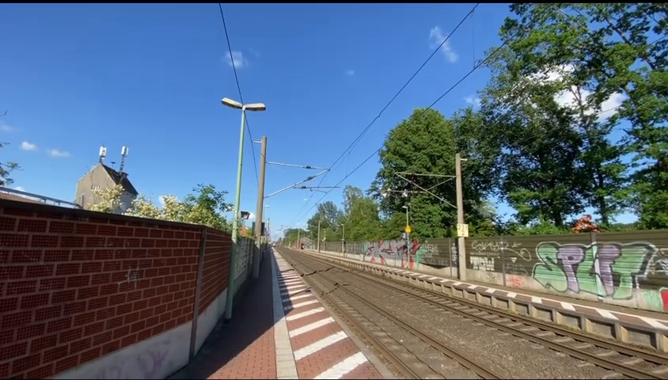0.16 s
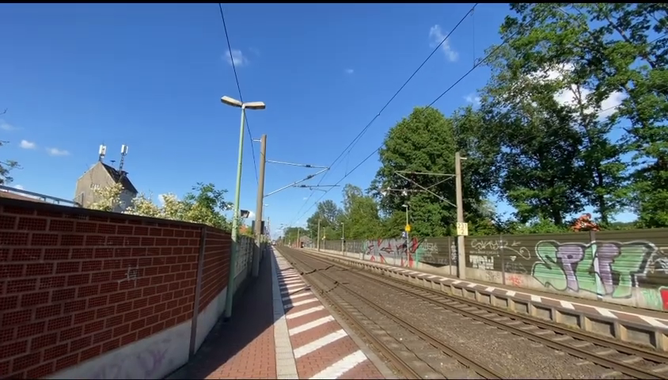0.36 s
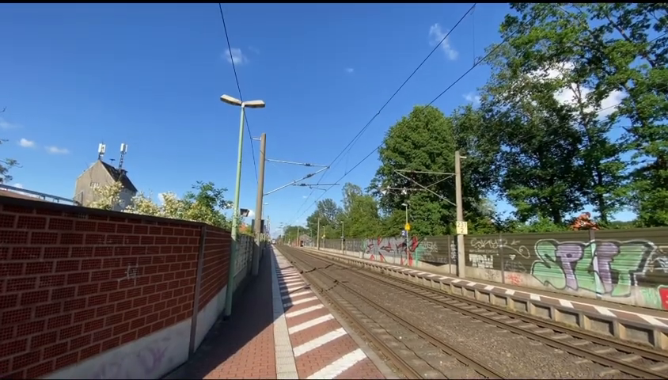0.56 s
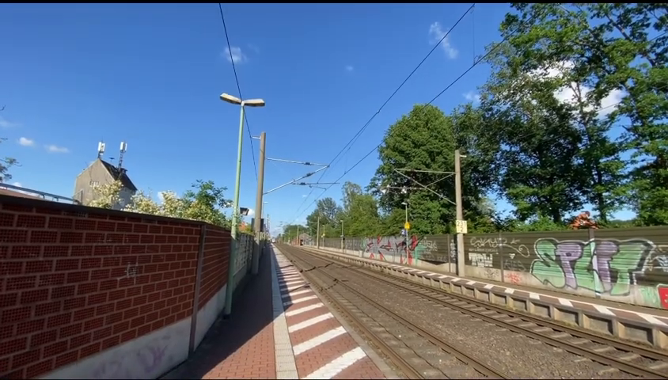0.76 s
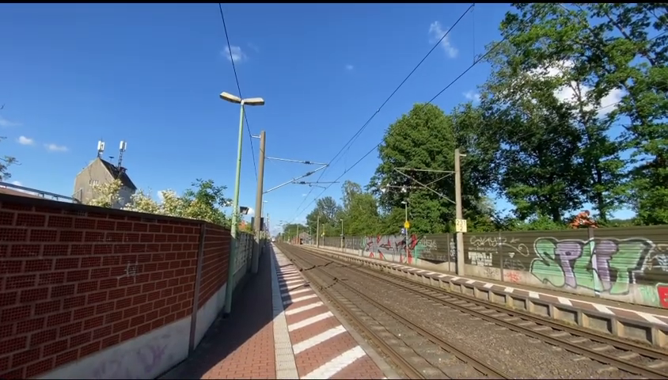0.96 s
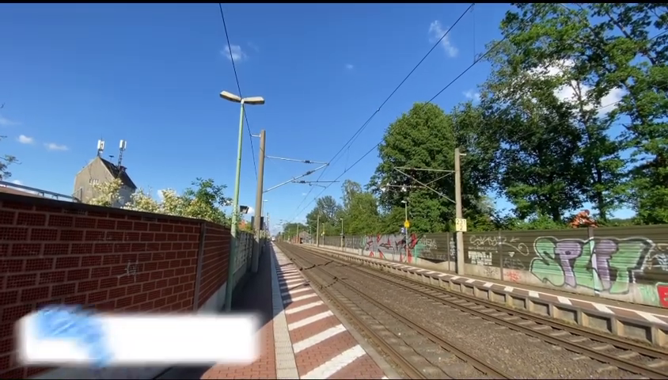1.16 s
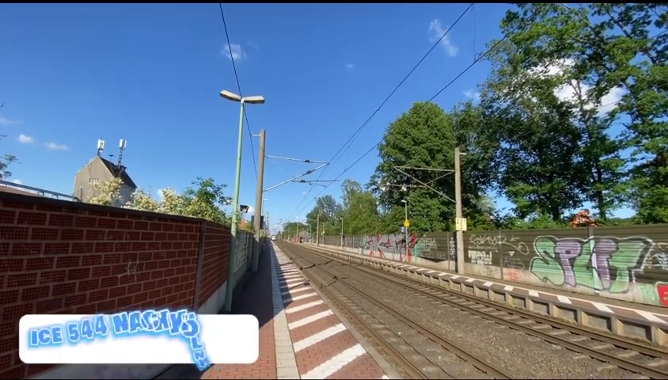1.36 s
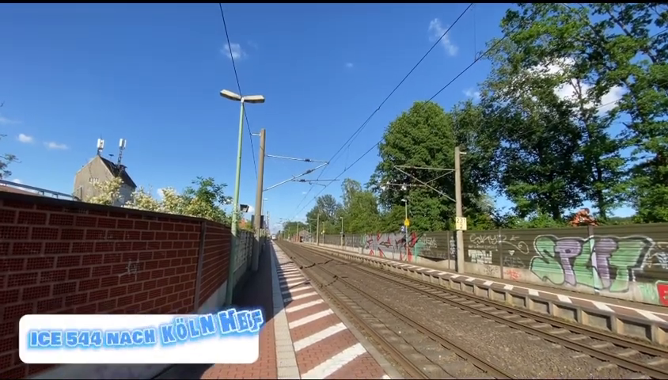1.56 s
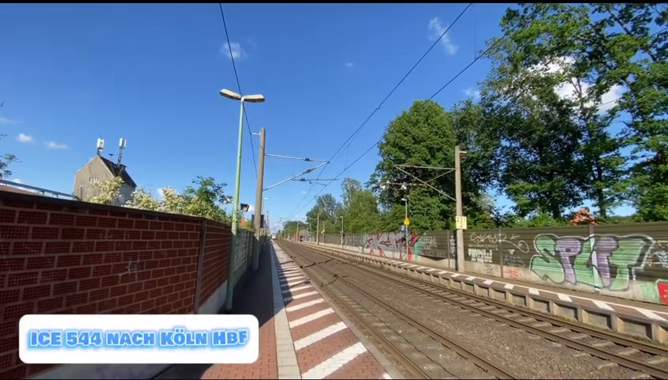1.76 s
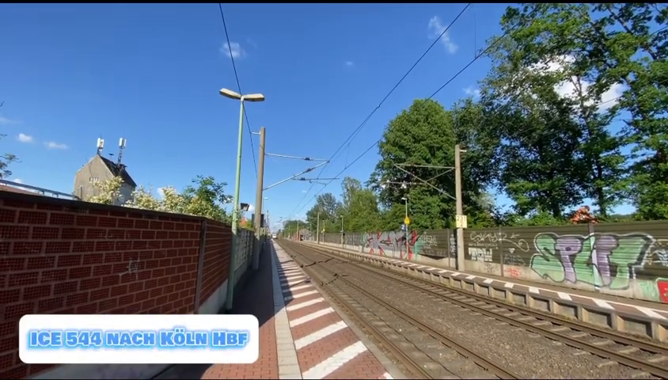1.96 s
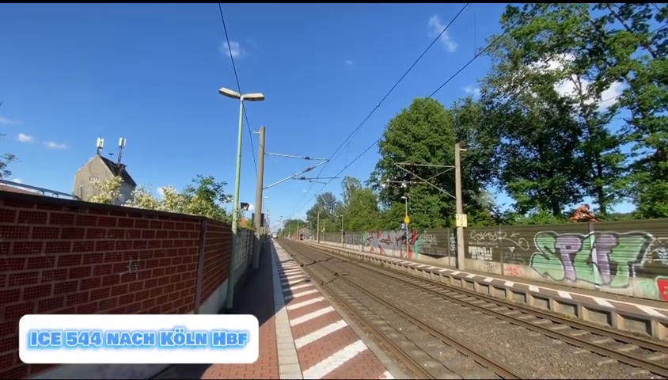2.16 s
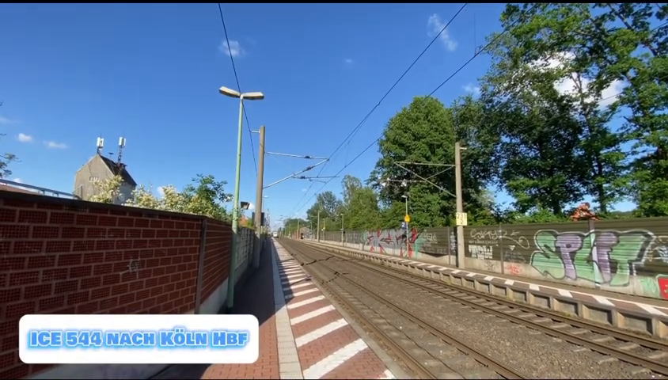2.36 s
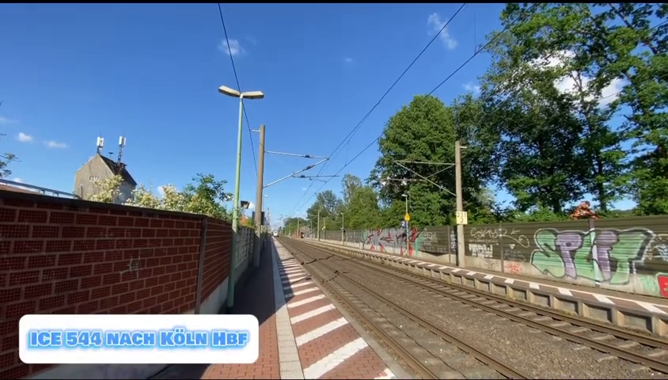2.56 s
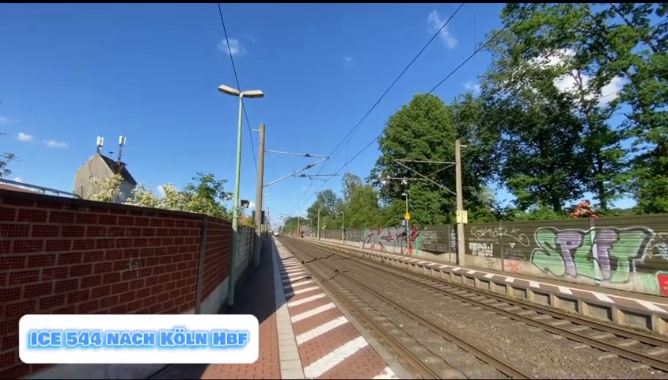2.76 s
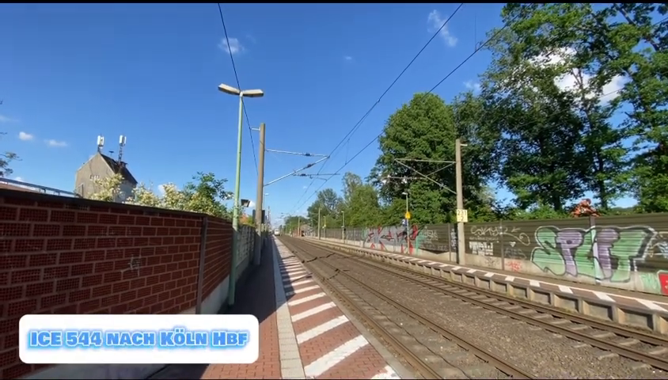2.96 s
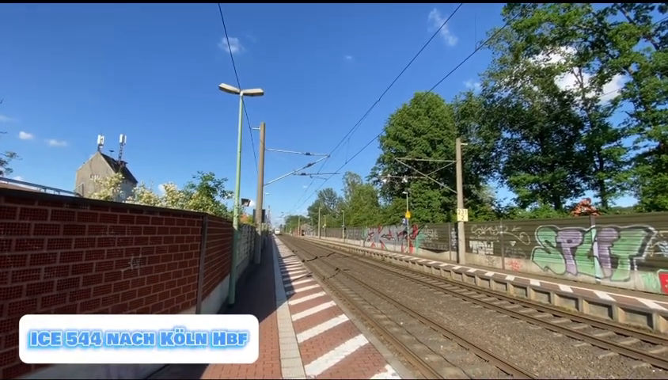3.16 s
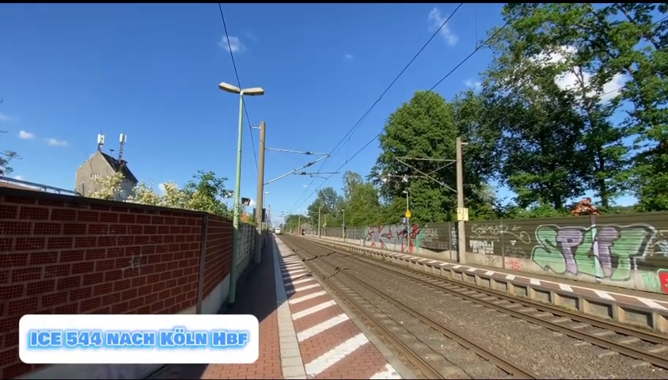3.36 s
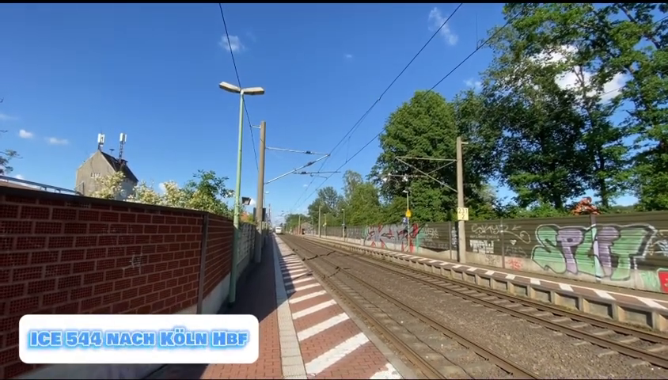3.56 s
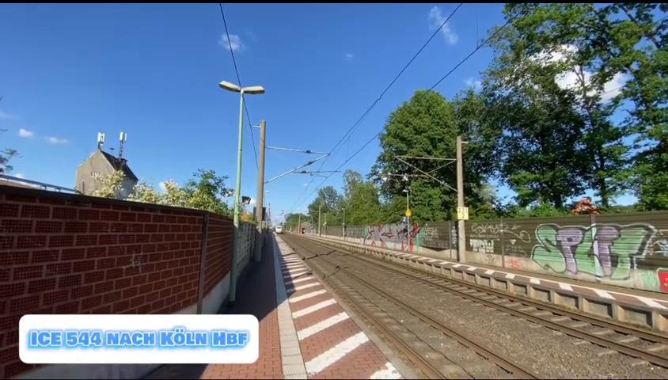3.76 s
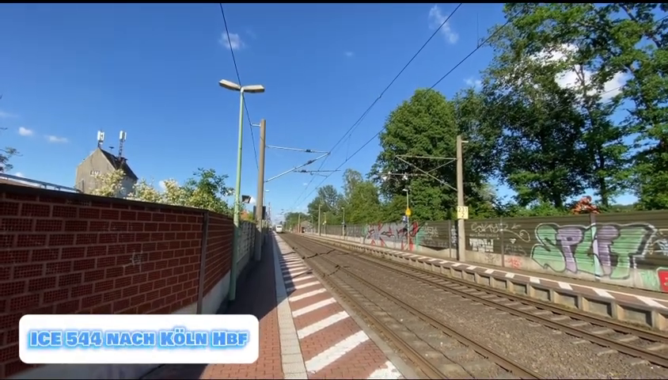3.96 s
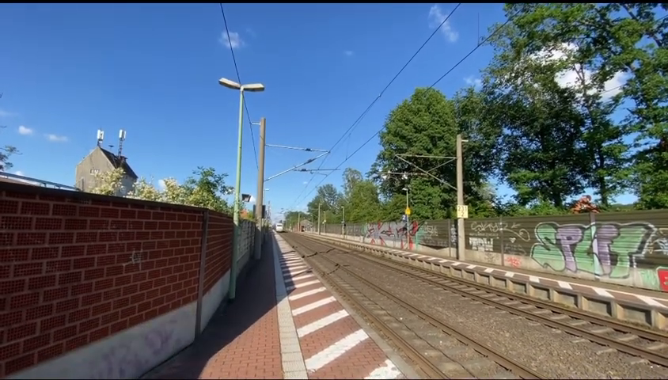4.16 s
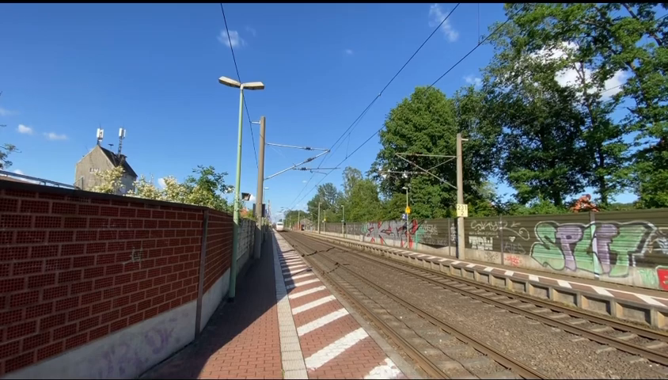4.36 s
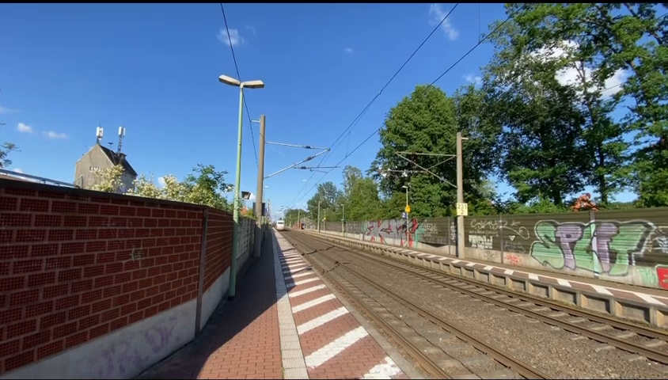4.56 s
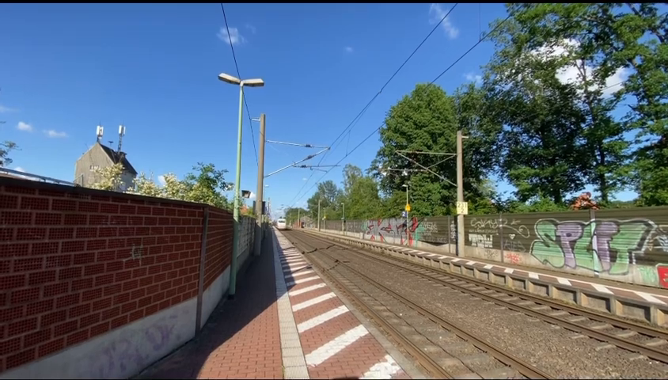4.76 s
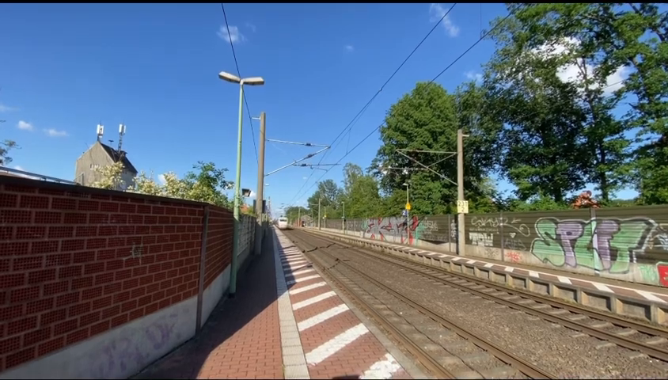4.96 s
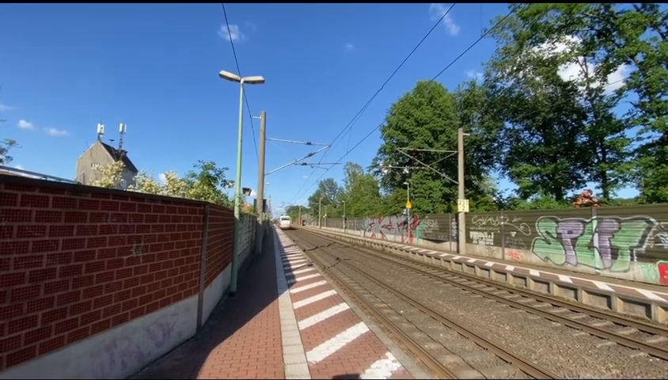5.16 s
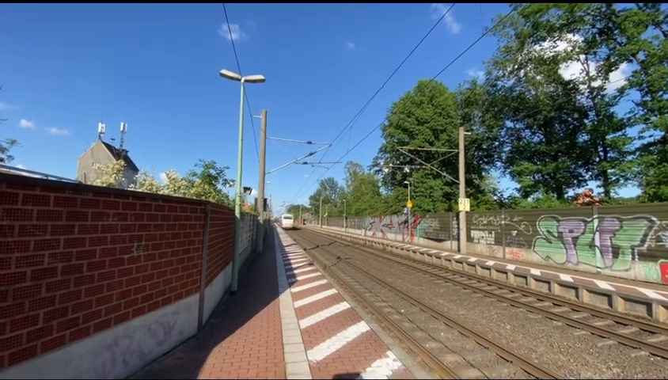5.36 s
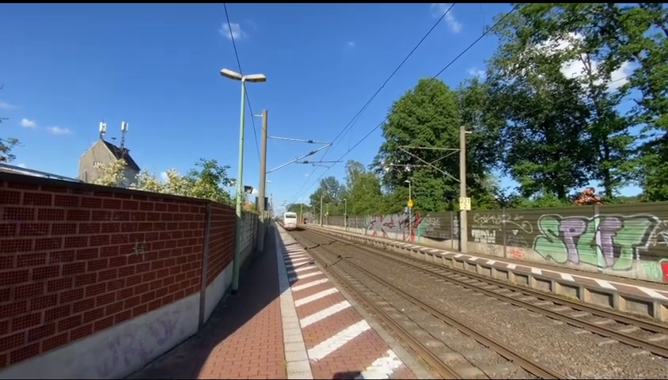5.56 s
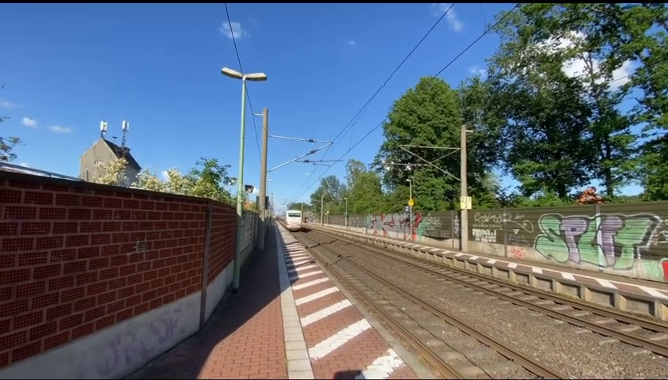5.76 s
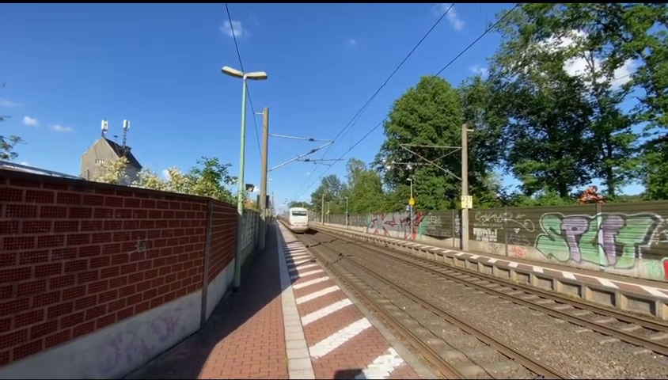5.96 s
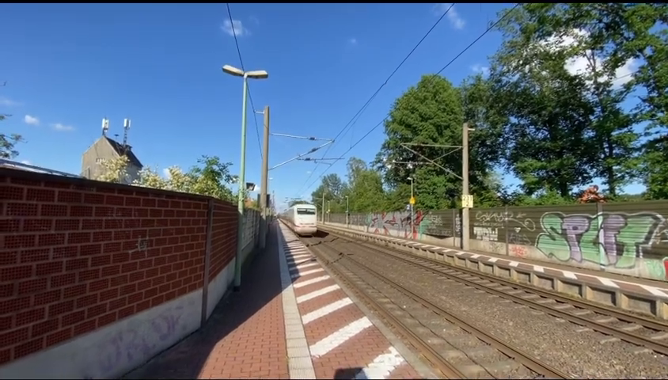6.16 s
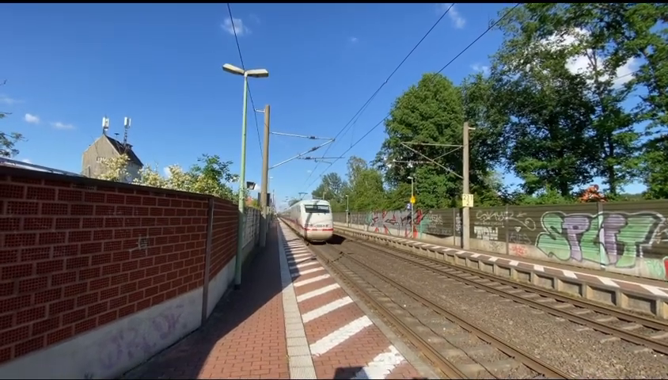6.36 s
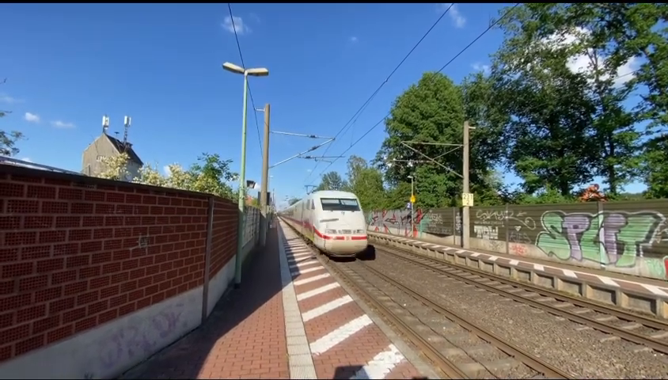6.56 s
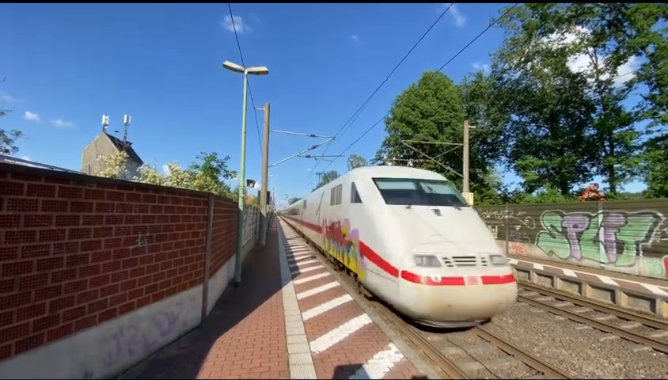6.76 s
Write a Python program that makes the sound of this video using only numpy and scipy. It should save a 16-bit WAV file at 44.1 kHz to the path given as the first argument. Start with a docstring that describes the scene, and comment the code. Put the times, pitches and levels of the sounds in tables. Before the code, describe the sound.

On an open-air railway platform beside a brick wall, a soft distant wash and faint hum carry a few high bird chips and dry ticks. The rails start to hiss and sing in thin metallic tones. A fast train then approaches, its wheel roar, rushing air and low rumble swelling steeply until the nose is almost level with the stationary stereo microphone, where the sound stops.

```python
"""A few small birds and faint ticks are heard first, over the distant wash and hum of an open-air platform.
The rails sing in narrow bands and thin tones long before a fast train arrives.
Then wheel roar, air rush, deep rumble and the drone of the sleepers swell until the nose is almost level.
Shaped noise makes the wash, rails, roar, rush, rumble and ticks; sines make the hum, birds, thin tones and
sleepers. The noise layers, except rumble and ticks, carry the notches of a wall's echo."""
import sys
import numpy as np
from scipy import signal
from scipy.fft import rfft, irfft
from scipy.io import wavfile
from scipy.ndimage import uniform_filter1d

SR = 44100
rng = np.random.default_rng(int(sys.argv[2]) if len(sys.argv) > 2 else 0)


def bounce(signal):
    """Save signal as a 16-bit WAV file at the path given by the first command-line argument."""
    frames = np.transpose(np.atleast_2d(signal))
    limited = np.clip(frames, -1, 1)
    pcm = np.round(limited * 32767).astype(np.int16)
    wavfile.write(sys.argv[1], SR, pcm)


N = 300754

SPEED_M_PER_S = 52
ARRIVAL_S = 7.242  # when the nose would reach the microphone, just after the end
IN_VIEW_S = 3.23  # the wall and the platform edge screen the far-off wheels until about here
SLEEPERS_HZ = 91.7
RAILS_REF_DB = -52  # rail level at which the levels of the rail bands hold
TOP_HZ = 15700  # upper band limit

# Frames of the noise layers, in samples, and the axes of time and frequency
FRAME, HOP = 4096, 512
TIME = np.arange(N) / SR
FRAME_S = np.arange(N // HOP + 4)[:, None] * HOP / SR
HZ = np.fft.rfftfreq(FRAME, 1 / SR)

# In every table of swells, length_s is the time from the peak to 1/e of its height.

# Colour of the open air: [pitch_hz, level_db per Hz]
BACKGROUND_COLOUR = [(20, -100), (100, -78.5), (150, -84.5), (250, -89), (380, -91.5), (650, -84),
                     (1000, -86.5), (1500, -86.5), (2000, -89), (2500, -95.5), (3000, -96.5), (4400, -102),
                     (5500, -107), (7000, -109), (8000, -114), (9500, -117), (11000, -121), (16000, -128)]
# Hollow far-off drone: [start_s, level_db per Hz at its centre, centre_hz]
FAR_DRONE = [(0, -86.5, 350), (1.2, -80.5, 350), (1.8, -83, 397), (2.2, -79.5, 446), (2.55, -77, 355),
             (2.9, -78, 350), (3.15, -92, 350), (4, -100, 350)]
# Faint far-off hum: [pitch_hz, level_db rms]
HUM_TONES = [(120, -84), (146, -68.5)]
# Bird notes: [start_s, length_s, start_hz, end_hz, level_db peak of the direct note]
BIRD_NOTES = [(0.335, .04, 7180, 7080, -69), (0.367, 0.12, 6900, 6600, -72), (.47, .17, 6680, 6560, -77),
              (0.978, 0.097, 7400, 7150, -77), (1.105, 0.023, 5060, 4820, -60),
              (1.148, .022, 4980, 4820, -63.5), (1.151, 0.038, 7280, 7100, -72),
              (1.616, .022, 4900, 4850, -70), (1.693, 0.024, 4800, 4960, -65),
              (1.737, .022, 4900, 5120, -65)]
# Faint dry ticks: [start_s, level_db peak, centre_hz, width_hz]
TICK_SNAPS = [(.125, -56, 9500, 4000), (0.61, -50, 4870, 7000), (.8894, -57, 9300, 3400),
              (2.031, -51, 9500, 2800), (2.5661, -49, 9250, 2800)]

# How strongly the rails vibrate at the platform: [time_s, level_db]
RAIL_LEVEL = [(0, -100), (.4, -89), (.7, -85.5), (1.1, -80), (2.1, -68.5), (4.1, -57.5), (5.8, -48),
              (6.82, -44.5)]
# Bands that travel far along the rails:
# [centre_hz, width_hz, level_db per Hz above the rail level at its reference, share of fading with distance]
RAIL_BANDS_FAR = [(450, 55, -28, 0.35), (1020, 67, -21, 0.63), (1157, 63, -15.5, 0.93),
                  (1198, 87, -19, 0.35), (1270, 42, -15.5, 0.33), (1338, 54, -24.5, 0.19),
                  (1485, 62, -30.5, 0.19), (2350, 350, -32.5, 0.33), (3530, 2230, -28.5, 0.87),
                  (4190, 160, -24.5, 1), (4650, 290, -28, 1.45), (5140, 390, -28.5, 1.34),
                  (5740, 1100, -32, 1.8), (7120, 200, -28, 1.25), (6700, 470, -30, 1.6),
                  (7950, 2000, -40, 3.2), (8640, 280, -31.5, 1.9), (9570, 46, -23, 0.96),
                  (9650, 310, -34, 2), (10140, 280, -32.5, 1.6), (10650, 285, -27, 0.95),
                  (11200, 890, -35.5, 1.7), (12050, 730, -30.5, 1.07), (13100, 400, -32, 0.92),
                  (14260, 1050, -31.5, 0.66)]
# Surges of hiss along the rails: [peak_s, length_s, centre_hz, width_hz, level_db per Hz]
RAIL_HISS_SURGES = [(.68, 0.24, 3270, 1700, -95.5), (1.22, 0.42, 3280, 1800, -94),
                    (2.66, 0.037, 3650, 450, -92), (3.05, 0.14, 4220, 3200, -94),
                    (3.12, 0.29, 1910, 910, -83.5), (3.9, .6, 1900, 804, -82), (5.4, .6, 3500, 910, -78.5)]
# Thin tones the rails sing for a while: [peak_s, length_s, pitch_hz, level_db rms at the loudest]
RAIL_TONES = [(1.9, 1.9, 1207, -60), (4.47, .25, 1388, -50.5), (1.21, .06, 4500, -68), (1.9, .2, 4510, -68),
              (2.55, .15, 4500, -68), (3.04, .22, 4505, -60), (5.42, .1, 4510, -57.5),
              (3.3, 1.1, 4190, -64), (2.45, .45, 5225, -68), (4, 1, 5255, -59), (4.5, 1, 7100, -65.5)]
# Rough and smooth rail under the wheels: [peak_s, length_s, lift_db at low pitch in the rails]
RAIL_ROUGHNESS = [(.05, .12, -10), (.82, 0.24, 7), (1.25, 0.2, 7), (1.52, 0.033, -7), (2.96, 0.083, 5.5),
                  (3.45, 0.063, -1.5), (3.65, 0.17, 6), (4.3, 0.057, 4.5), (4.595, 0.069, 11)]

# Level of the sleepers' drone, which drops at the very end: [time_s, level_db rms]
SLEEPER_LEVEL = [(0, -80), (3.3, -58), (4.5, -46), (5.5, -42), (5.95, -29), (6.45, -23.5), (6.57, -18),
                 (6.71, -20), (6.82, -43)]
# Colour of the rumble: [pitch_hz, relative level_db]
RUMBLE_COLOUR = [(10, -45), (25, -29), (35, -12), (45, -3.5), (58, 2), (70, 0), (82, -13.5), (105, -45),
                 (200, -36), (500, -84)]
# Strongest swells and lulls of the rumble: [peak_s, length_s, lift_db]
RUMBLE_SURGES = [(.92, 0.13, -9), (1.22, 0.31, 2), (2.15, 0.059, 4), (3.03, 0.025, 5), (3.72, 0.24, 2),
                 (4.81, 0.022, 3), (5.12, 0.17, 4), (5.75, 0.1, 4.5)]

# Colour of the wheel roar: [pitch_hz, relative level_db]
WHEEL_COLOUR = [(100, -6.5), (250, -19), (450, -8.5), (600, 1), (700, -5.5), (870, 1), (1080, -4.5),
                (1250, -2.5), (1480, -6.5), (2300, -4.5), (2800, -10.5), (4500, -9), (7000, -16),
                (16000, -80)]
# Peaks and a dip in the colour of the train's roar: [centre_hz, width_hz, lift_db close by]
ROAR_PEAKS = [(156, 14, 3), (212, 23, 4), (332, 39, 3.5), (455, 53, 3.5), (604, 12, 0.5), (738, 44, 4),
              (883, 47, 2), (1010, 34, -1), (1876, 130, 5)]
# Colour of the air rush: [pitch_hz, relative level_db]
RUSH_COLOUR = [(20, -36), (70, -33), (115, 4), (160, -1.5), (230, -1), (400, 0.5), (560, -2), (800, -8),
               (1500, -10.5), (2800, -14.5), (4200, -19), (5500, -15.5), (7000, -14.5), (8700, -13),
               (9500, -21), (12000, -17), (15500, -23)]
# The roar blooms as the nose runs in beside the platform:
# [peak_s, length_s, centre_hz, width_hz, lift_db]
NOSE_BLOOMS = [(6.322, 0.24, 354, 400, 2.5), (6.628, 0.16, 3000, 7140, 2.5), (6.795, 0.079, 734, 476, 3.5)]

# Left-right likeness and lead by pitch, used for the far layers; treble near 11 kHz is almost mono:
# [pitch_hz, left-right likeness -1 to 1, lead of the left in radians]
FAR_STEREO = [(140, 0.91, 1), (446, 0.78, 0.5), (820, 0.27, 0.8), (1190, 0.67, -1.18), (1510, 0.19, -2.5),
              (1850, 0.31, 2.5), (2340, 0.71, 1.06), (2920, 0.41, 2), (4140, .35, 1.27), (4500, 0.4, 4),
              (5500, 0.54, 3.5), (6400, .1, 0.5), (6500, 0.49, 0.5), (7100, 0.36, 0.6), (7800, 0.22, 2),
              (9670, 0.36, 4.5), (10370, 1, -0.5), (11330, .97, -0.5), (12800, 0.58, -3)]
# Left-right likeness and lead by pitch, used for the train layer; treble near 11 kHz is almost mono:
# [pitch_hz, left-right likeness -1 to 1, lead of the left in radians]
NEAR_STEREO = [(140, 0.97, -0.044), (320, .93, -0.025), (646, 0.59, -0.27), (840, 0.33, 0.27),
               (1180, 0.38, 0.28), (1660, -0.083, -0.37), (1900, -0.51, 0.35), (2210, -0.0013, 0.97),
               (3270, 0.31, 0.64), (4000, 0.25, 0.92), (5360, -0.48, -0.8), (6500, 0.27, 0.048),
               (6900, 0.84, 0), (7650, -.15, 0), (9500, 0.26, 0.0068), (10500, .97, 0), (11700, .97, 0),
               (13000, -0.31, 0.5)]
# How far the wall's echo lags behind the direct sound: [time_s, lag_s]
WALL_LAG = [(0, .00704), (3.75, .00719), (5.2, .00729), (6.8, .00736)]
# Strength of that echo at a distance: [pitch_hz, share of the direct sound]
WALL_STRENGTH = [(150, 0), (350, 0.18), (700, 0.38), (1050, 0.31), (1700, 0.28), (5000, 0.13)]


def amp(db):
    """Decibels to gain."""
    return 10 ** (np.asarray(db) / 20)


def curve(rows, s):
    """Reads a table of (s, value) at the times s."""
    return np.interp(s, *np.transpose(rows))


def spectrum(rows, hz=HZ):
    """Reads a table of (Hz, value) on a log-frequency axis."""
    f, value = np.transpose(rows)
    return np.interp(np.log(hz + 1), np.log(f + 1), value)


def bell(hz, width):
    """A hump over frequency, of height 1 and the given full width at half height."""
    return .5 ** ((2 * (HZ - hz) / width) ** 2)


def hump(s, at_s, length_s):
    """A smooth swell of height 1 around the time at_s."""
    return np.exp(-((s - at_s) / length_s) ** 2)


def step(s, at_s, length_s):
    """A smooth rise from 0 to 1 around the time at_s."""
    return .5 + .5 * np.tanh((s - at_s) / length_s)


def swells(rows, s):
    """Lift in dB at the times s from a table of smooth humps."""
    return sum(db * hump(s, at, length) for at, length, db in rows)


def evened(x):
    """Scales to rms 1."""
    return x / np.sqrt(np.mean(x ** 2) + 1e-20)


def drift(shape, size):
    """Smooth random field of rms 1, with patches of the given size along the leading axes."""
    x = rng.standard_normal(shape)
    for axis, length in enumerate(size):
        x = uniform_filter1d(x, length, axis)
    return evened(x)


def wavering_sine(hz):
    """A sine whose pitch follows hz sample by sample."""
    return np.sin(2 * np.pi * np.cumsum(hz) / SR)


def distance(s):
    """Metres the nose still has to travel at the times s."""
    return SPEED_M_PER_S * np.maximum(ARRIVAL_S - s, 0)


def approach(s, db_per_halving, size_m):
    """Level in dB against that at 100 m: grows per halving of range until the source's size limits it."""
    range_m = np.hypot(distance(s), size_m)
    return -db_per_halving * np.log2(range_m / np.hypot(100, size_m))


def wall_echo(fading_m=45):
    """Echo off the brick wall: evenly spaced notches sink as the train nears and fill in at close range."""
    strength = np.clip(spectrum(WALL_STRENGTH), 0, .9) * (1 - np.exp(-distance(FRAME_S) / fading_m))
    lag_s = curve(WALL_LAG, FRAME_S)
    notched = abs(1 - strength * np.exp(-2j * np.pi * HZ * lag_s))
    return notched / np.hypot(1, strength)


def noise(density, patchy_db, ports):
    """Stereo noise of a given amplitude per root Hz, notched by the wall and broken into turbulent patches."""
    white = rng.standard_normal((2, (len(FRAME_S) - 1) * HOP))
    frames = signal.stft(white, nperseg=FRAME, noverlap=FRAME - HOP)[2]
    a, b = frames.swapaxes(1, 2)
    # the left-right likeness sets the balance of shared and opposed noise
    likeness = np.clip(spectrum([(hz, same) for hz, same, lead in ports]), -1, 1)
    mid = a * np.sqrt((1 + likeness) / 2)
    side = b * np.sqrt((1 - likeness) / 2)
    turn = np.exp(.5j * spectrum([(hz, lead) for hz, same, lead in ports]))
    stereo = np.array([(mid + side) * turn, (mid - side) / turn])
    patches = amp(patchy_db * drift(a.shape, size=(6, 20)))
    shaped = stereo * density * wall_echo() * patches
    sound = signal.istft(shaped.swapaxes(1, 2), nperseg=FRAME, noverlap=FRAME - HOP)[1]
    return np.sqrt(SR / 2) * sound[:, :N]


def add(mix, s, sound):
    """Adds a sound to the mix at time s."""
    part = mix[round(s * SR):][:len(sound)]
    part += sound[:len(part)]


def background(drone_width_hz=90, drone_waver=0.057):
    """Far-off wash of the open air; its hollow, wandering drone dies away before the train is in view."""
    s, db, hz = np.transpose(FAR_DRONE)
    wander = 1 + drone_waver * drift(FRAME_S.shape, size=(12,))
    centre_hz = np.interp(FRAME_S, s, hz) * wander
    drone = np.sqrt(bell(centre_hz, drone_width_hz)) * amp(np.interp(FRAME_S, s, db))
    wash = amp(spectrum(BACKGROUND_COLOUR))
    return noise(np.hypot(wash, drone), patchy_db=1.86, ports=FAR_STEREO)


def hum(waver=0.0133):
    """Two low tones that wander slightly in pitch."""
    out = np.zeros(N)
    for hz, db in HUM_TONES:
        wandering_hz = hz * (1 + waver * drift(N, size=(4000,)))
        out += amp(db) * evened(wavering_sine(wandering_hz))
    return out


def ticks(decay_s=0.0055):
    """Tiny bright snaps: bursts of band-passed noise that die within milliseconds."""
    out, t = np.zeros(N), np.arange(SR // 20) / SR
    for s, db, hz, width_hz in TICK_SNAPS:
        edges_hz = np.clip([hz - width_hz / 2, hz + width_hz / 2], 100, TOP_HZ)
        band = signal.butter(2, edges_hz, "band", fs=SR, output="sos")
        snap = signal.sosfilt(band, rng.standard_normal(len(t)) * np.exp(-t / decay_s))
        add(out, s, amp(db) * snap / abs(snap).max())
    return out


def birds(quaver=0.02, echo=0.67, echo_s=0.032):
    """Thin gliding whistles and chips, smeared by the trees they come from with a short noise tail."""
    out, t = np.zeros(N), np.arange(SR // 4) / SR
    for s, length, start_hz, end_hz, db in BIRD_NOTES:
        count = int(length * SR)
        hz = np.linspace(start_hz, end_hz, count) * (1 + quaver * drift(count, size=(30,)))
        add(out, s, amp(db) * signal.windows.tukey(count) * wavering_sine(hz))
    tail = rng.standard_normal((2, len(t))) * np.exp(-t / echo_s)
    smeared = signal.fftconvolve(out[None], tail / np.linalg.norm(tail[0]), axes=1)[:, :N]
    return out + echo * smeared


def rails(patchy_db=1.7, ripple_db=1.5, pulse_db=0.1, rough_hz=1800):
    """Wheel vibration runs ahead in narrow bands, the more damped ones emerging later; hiss surges."""
    level_db = curve(RAIL_LEVEL, FRAME_S) - RAILS_REF_DB
    power = 0
    for hz, width, db, fading in RAIL_BANDS_FAR:
        power = power + bell(hz, width) * amp(RAILS_REF_DB + db + fading * level_db) ** 2
    hiss = 0
    for at, length, hz, width, db in RAIL_HISS_SURGES:
        hiss = hiss + bell(hz, width) * (amp(db) * hump(FRAME_S, at, length)) ** 2
    # a fixed random ripple over pitch gives the bands an uneven, finely lined colour
    fine_db = ripple_db * drift(len(HZ), size=(3,))
    # uneven rail makes mainly the low bands pulse and swell
    uneven_db = swells(RAIL_ROUGHNESS, FRAME_S) + pulse_db * drift(FRAME_S.shape, size=(5,))
    rough_db = uneven_db / (1 + (HZ / rough_hz) ** 2)
    density = np.sqrt(power * amp(fine_db + rough_db) ** 2 + hiss)
    return noise(density, patchy_db, FAR_STEREO)


def rail_song(waver=0.00304, flutter_db=4.5):
    """Lightly damped rail modes ring up and die away as thin, wavering tones."""
    out = np.zeros((2, N))
    for at, length, hz, db in RAIL_TONES:
        phase = 2 * np.pi * np.cumsum(hz * (1 + waver * drift(N, size=(500,)))) / SR
        lead = spectrum([(port_hz, lead) for port_hz, likeness, lead in FAR_STEREO], hz)
        flutter = amp(flutter_db * drift(N, size=(1200,)))
        tone = evened(flutter * np.sin([phase + lead, phase]))
        out += amp(db) * hump(TIME, at, length) * tone
    return out


def sleepers(waver=0.013, throb_db=2.3):
    """Axles beat over evenly spaced sleepers: a low sine, its pitch wavering and its level throbbing."""
    pitch = np.interp(TIME, FRAME_S[:, 0], drift(len(FRAME_S), size=(7,)))
    throb = np.interp(TIME, FRAME_S[:, 0], drift(len(FRAME_S), size=(4,)))
    tone = wavering_sine(SLEEPERS_HZ * (1 + waver * pitch))
    return evened(tone * amp(throb_db * throb)) * amp(curve(SLEEPER_LEVEL, TIME))


def rumble(level_db=-35, steadiness=0.72):
    """Deep shudder of the track bed, the same in both ears; it grows with nearness and comes in swells."""
    colour = amp(spectrum(RUMBLE_COLOUR, np.fft.rfftfreq(N, 1 / SR)))
    x = evened(irfft(rfft(rng.standard_normal(N)) * colour, N))
    # partly level out the noise's own swells
    swell = np.sqrt(uniform_filter1d(abs(signal.hilbert(x)) ** 2, size=6000))
    near_db = approach(TIME, db_per_halving=9.5, size_m=36)
    return evened(x / swell ** steadiness) * amp(level_db + near_db + swells(RUMBLE_SURGES, TIME))


def wheel_level(level_db=-61.0, screened_db=-83.5, rough_share=0.15):
    """Wheel roar in dB: faint while screened, then growing with nearness; rough rail lifts it."""
    open_db = level_db + approach(FRAME_S, db_per_halving=5.5, size_m=6.3)
    in_view = step(FRAME_S, at_s=IN_VIEW_S, length_s=0.77)
    rough_db = rough_share * swells(RAIL_ROUGHNESS, FRAME_S)
    return screened_db + (open_db - screened_db) * in_view + rough_db


def rush_level(level_db=-66.0, ground_db_per_m=0.01):
    """Air rush in dB: it grows steeply with nearness, as the ground also soaks it up along the way."""
    beyond_m = distance(FRAME_S) - 100
    return level_db + approach(FRAME_S, db_per_halving=11.0, size_m=20.0) - ground_db_per_m * beyond_m


def buffeting(depth_db=1.7, reach_m=50):
    """Gain over time: close by, eddies shed from the body make the roar flutter roughly."""
    near = np.exp(-distance(TIME) / reach_m)
    return evened(amp(depth_db * near * drift(N, size=(550,))))


def train(air_db_per_m=0.2626, air_hz=8000, peak_fade_m=400, surge_db=0.06,
          bow_db=6.5, bow_hz=210, bow_width_hz=120, bow_reach_m=45):
    """Wheel roar and the rush of air round the body; distance takes the treble away."""
    away_m = distance(FRAME_S)
    absorbed_db = air_db_per_m * away_m * HZ / air_hz  # air_db_per_m holds at air_hz
    # large eddies round the nose thicken the rush over the last metres
    bow_lift_db = bow_db * bell(bow_hz, bow_width_hz) * np.exp(-away_m / bow_reach_m)
    surges_db = surge_db * drift(FRAME_S.shape, size=(10,))
    wheels = amp(wheel_level() + spectrum(WHEEL_COLOUR) + surges_db)
    rush = amp(rush_level() + spectrum(RUSH_COLOUR) + bow_lift_db)
    # peaks in the colour of the roar, the higher ones strengthening as it nears
    peaks_db, top_peak_hz = 0, ROAR_PEAKS[-1][0]
    for hz, width, db in ROAR_PEAKS:
        nearness = np.exp(-away_m / peak_fade_m * (hz / top_peak_hz) ** 2)
        peaks_db = peaks_db + db * bell(hz, width) * nearness
    bloom_db = 0
    for at, length, hz, width, db in NOSE_BLOOMS:
        bloom_db = bloom_db + db * hump(FRAME_S, at, length) * bell(hz, width)
    density = np.hypot(wheels, rush) * amp(peaks_db + bloom_db - absorbed_db)
    return noise(density, patchy_db=1.0, ports=NEAR_STEREO)


def scene():
    """The train and its track over the quiet of the platform."""
    platform = background() + hum() + birds() + np.array([ticks(), ticks()])
    track = rails() + rail_song() + sleepers() + rumble()
    return platform + track + train() * buffeting()


def record(dry, low_cut_hz=27):
    """The microphone's low cut and the recorder's band limit."""
    low_cut = signal.butter(3, low_cut_hz, "high", fs=SR, output="sos")
    thinned = signal.sosfilt(low_cut, dry)
    band_limit = signal.firwin(255, TOP_HZ, window=("kaiser", 9), fs=SR)
    return signal.oaconvolve(thinned, band_limit[None], "same")


dry = scene()
out = record(dry)
bounce(out)
```